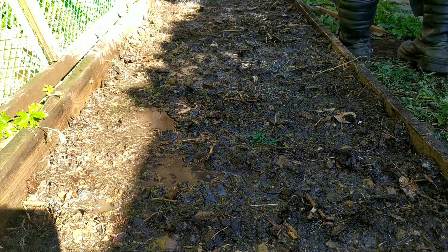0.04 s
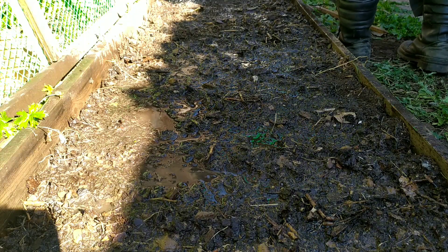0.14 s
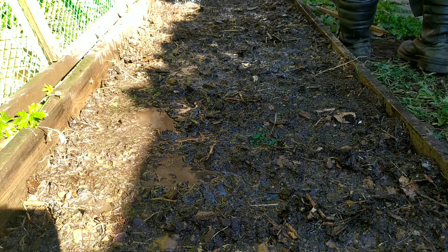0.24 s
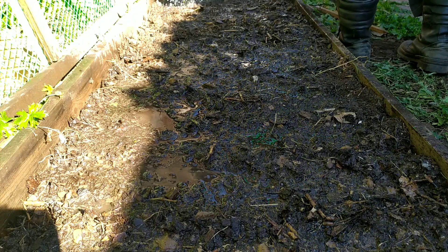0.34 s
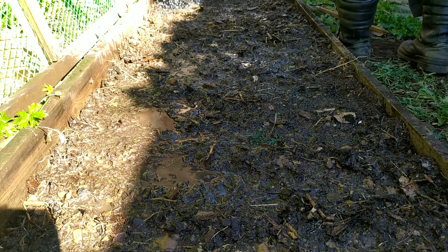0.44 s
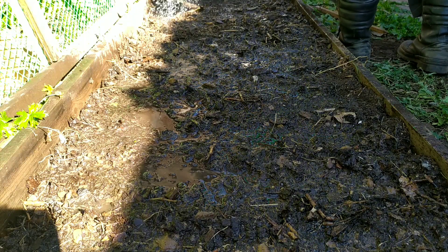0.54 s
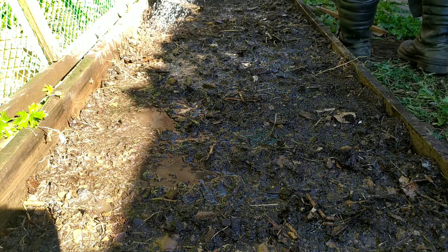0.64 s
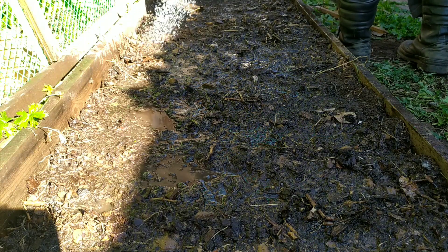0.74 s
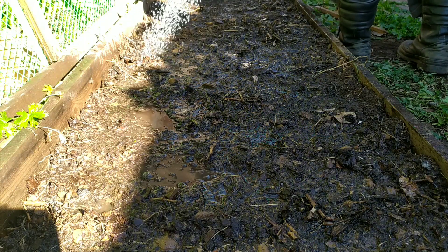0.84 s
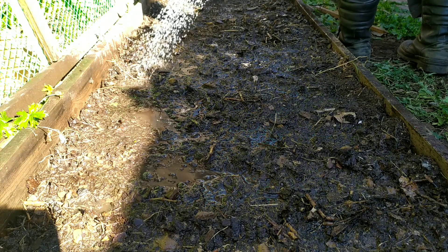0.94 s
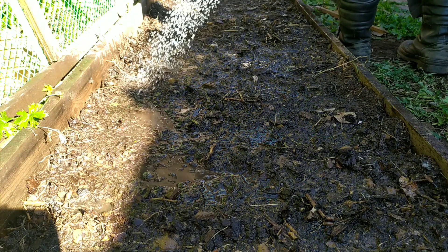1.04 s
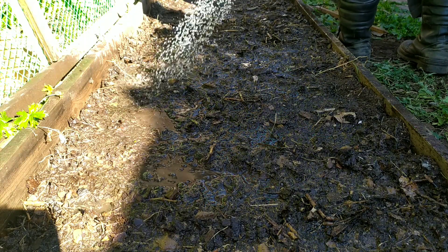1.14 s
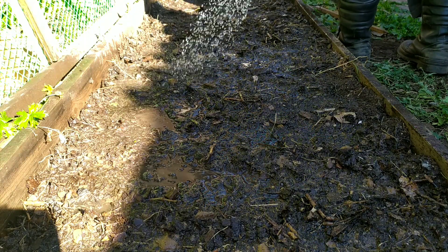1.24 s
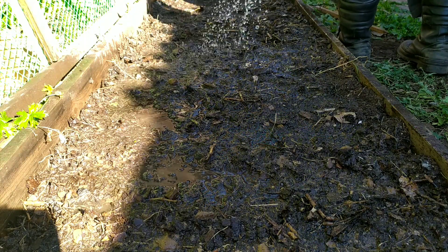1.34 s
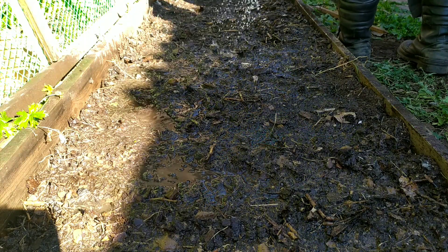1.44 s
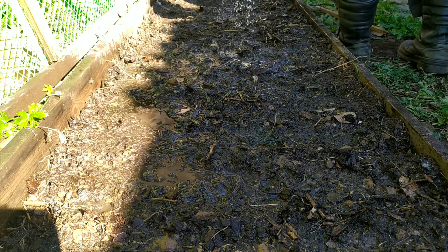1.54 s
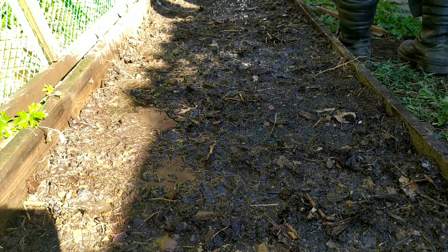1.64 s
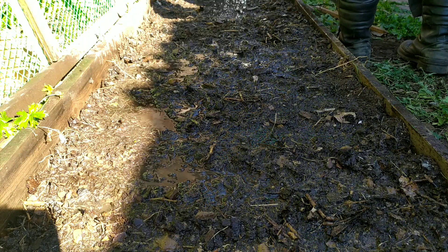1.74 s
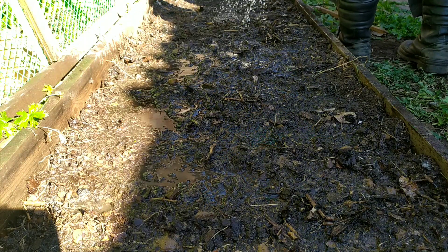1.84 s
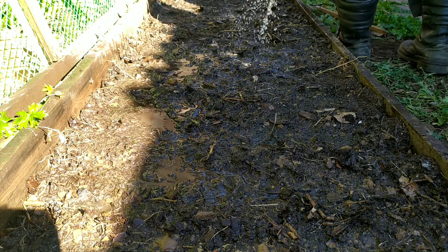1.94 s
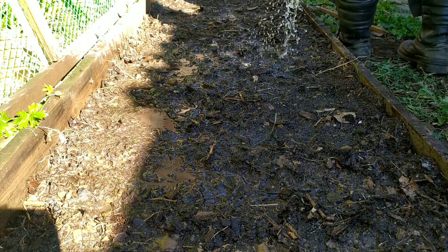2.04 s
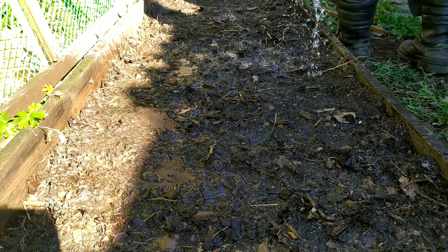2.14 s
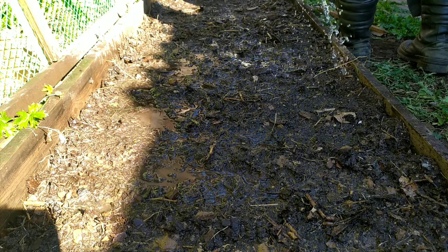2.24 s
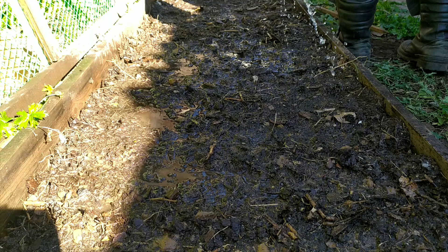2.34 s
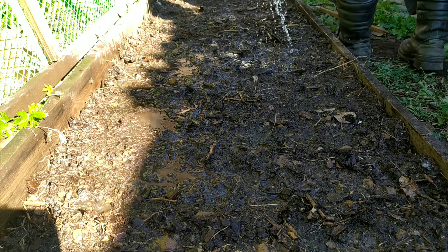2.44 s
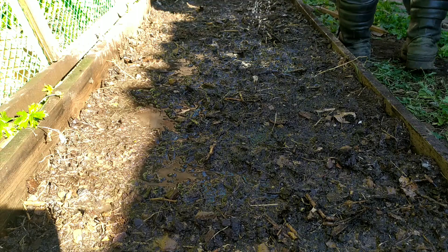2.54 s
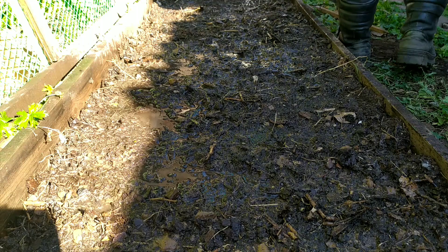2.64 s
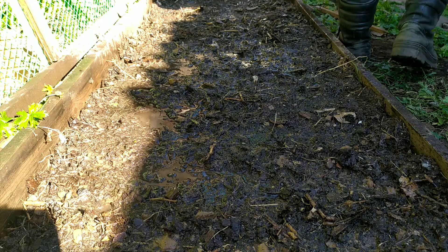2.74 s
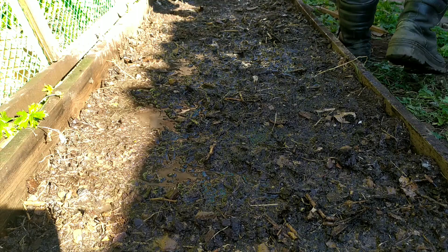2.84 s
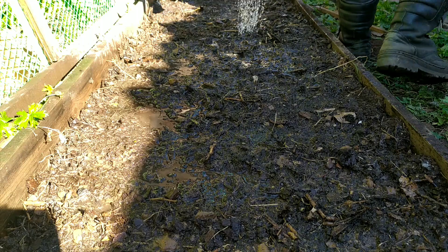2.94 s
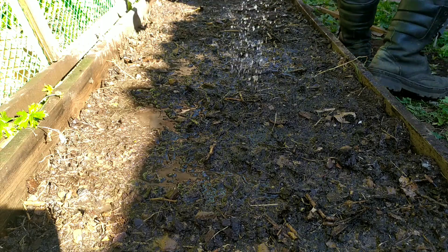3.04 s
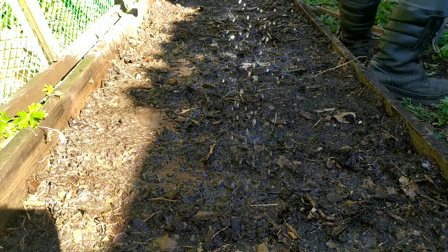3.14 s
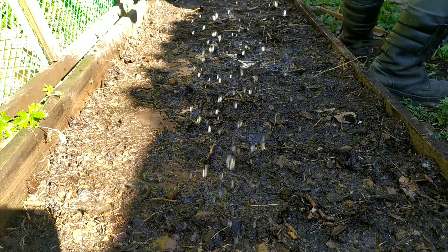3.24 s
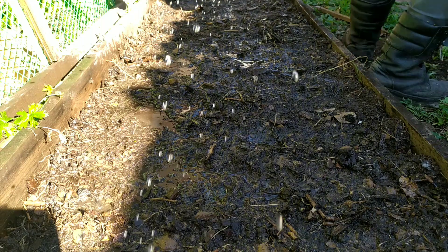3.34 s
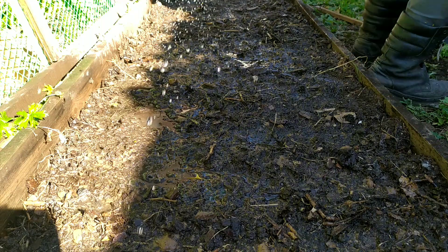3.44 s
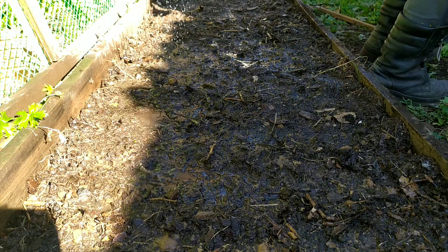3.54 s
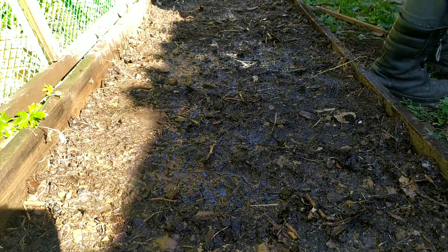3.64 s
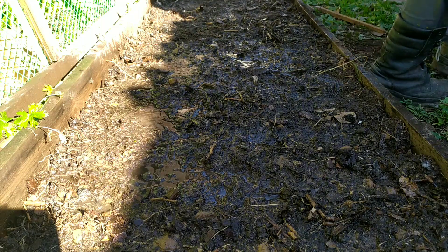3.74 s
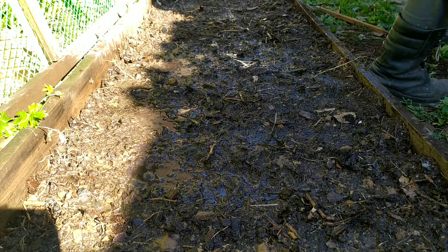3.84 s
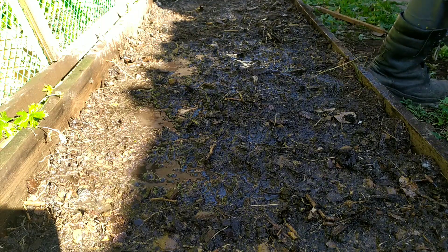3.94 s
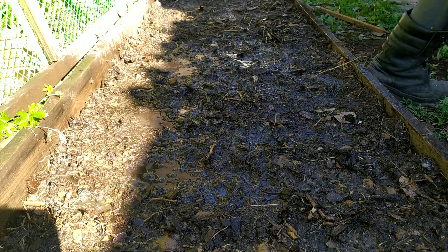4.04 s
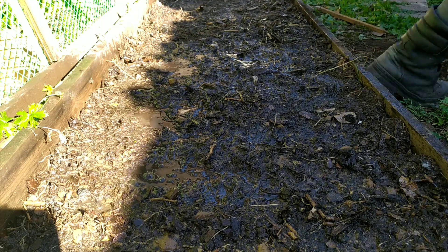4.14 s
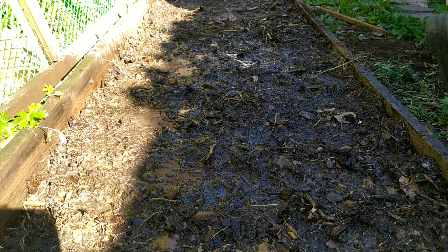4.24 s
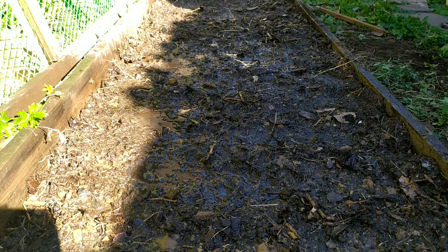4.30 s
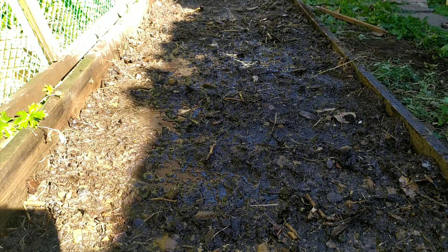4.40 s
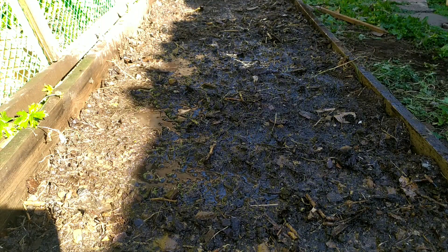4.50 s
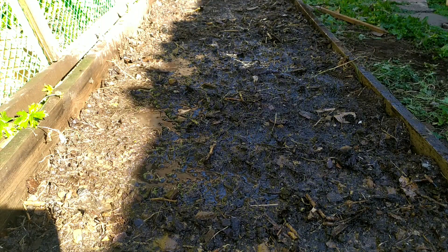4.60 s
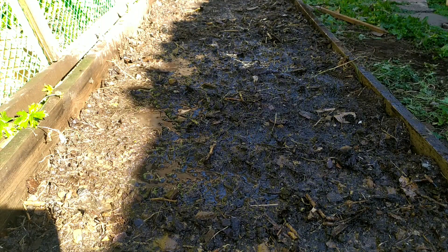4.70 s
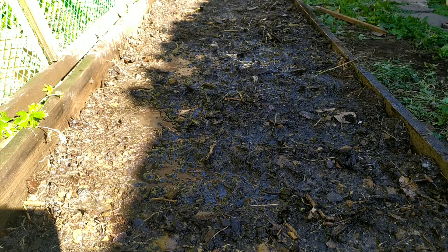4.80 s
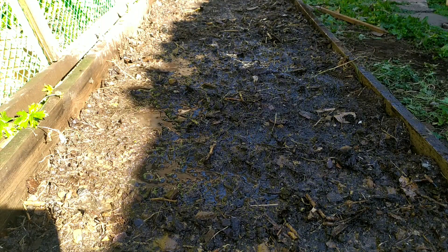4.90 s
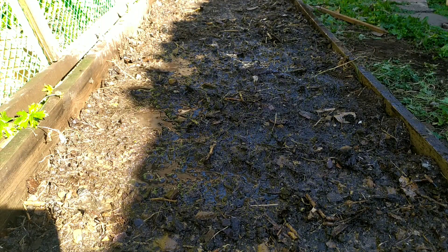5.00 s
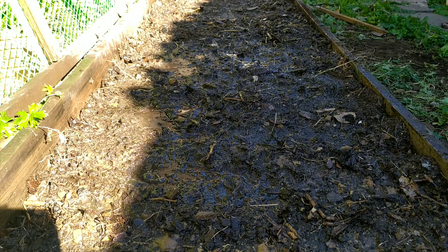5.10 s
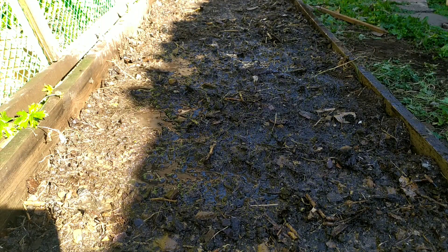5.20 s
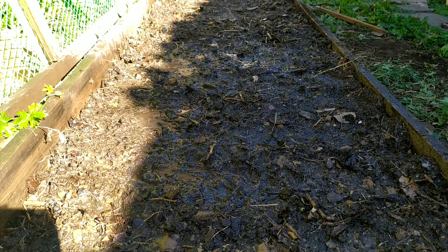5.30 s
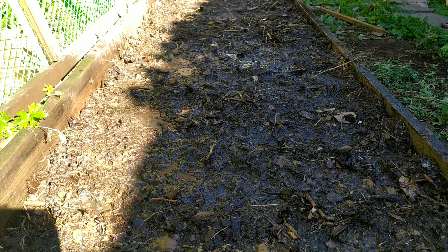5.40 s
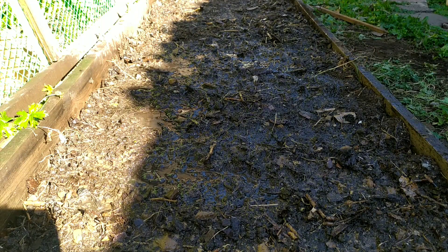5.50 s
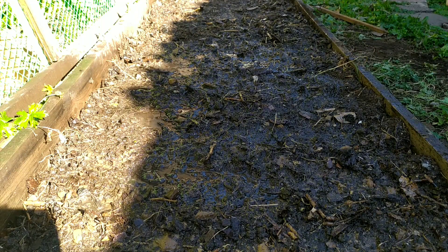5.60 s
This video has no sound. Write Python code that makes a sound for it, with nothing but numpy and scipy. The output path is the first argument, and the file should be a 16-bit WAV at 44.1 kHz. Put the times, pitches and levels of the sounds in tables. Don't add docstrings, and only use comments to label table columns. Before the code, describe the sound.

A watering can showers wet garden soil in hissing sweeps, thins to drips, then rubber boots thump a plank and scuff dry leaves.

```python
import sys
import numpy as np
from scipy import signal
from scipy.fft import rfft, irfft, next_fast_len
from scipy.io import wavfile
from scipy.ndimage import uniform_filter1d

SR = 44100
rng = np.random.default_rng(int(sys.argv[2]) if len(sys.argv) > 2 else 0)


def wrap_up_sound(samples):
    columns = np.atleast_2d(samples).T
    tamed = np.clip(columns, -1, 1)
    steps = np.round(tamed * 32767).astype(np.int16)
    wavfile.write(sys.argv[1], SR, steps)


def voltage_ratio(decibels):
    exponent = np.asarray(decibels, float) / 20
    return 10 ** exponent


N = 249606
T = np.arange(N) / SR
TOP_HZ = 14500

# start_s, left_late_samples
WATER_AIM = [(0, 1), (.3, 1.5), (.6, 3), (.85, 4.2), (.97, 5), (1.06, 5.6), (1.17, 5), (1.25, 3),
             (1.32, .4), (1.45, 0), (1.95, -1), (2.3, -5), (2.4, -5), (2.55, -3), (2.7, -1), (3.2, -.6),
             (3.32, 1.6), (3.5, .4), (3.6, 4), (4, 4)]
# start_s, left_late_samples
WALK_PATH = [
    (0, -17),
    (4.3, -17),
    (4.45, -21),
    (5.66, -22),
]
# frequency_hz, left_right_db
MIC_LEAN = [(300, -1), (3000, -1), (7500, -1), (11500, 2), (15000, 3)]


def evened(x):
    return x / np.sqrt(np.mean(x ** 2) + 1e-20)


def read(points, hz):
    f, value = np.transpose(points)
    return np.interp(np.log(hz + 1), np.log(f + 1), value)


def curves(rows):
    s, *columns = np.transpose(rows)
    return [np.interp(T, s, c) for c in columns]


def add(mix, s, sound, pan_db, late):
    for side, sign in enumerate((1, -1)):
        start = round(s * SR) + (1 - side) * round(late)
        part = mix[side, start:][:sound.shape[1]]
        part += voltage_ratio(sign * pan_db / 2) * sound[side, :len(part)]


def delayed(x, late):
    return x[np.clip(np.arange(N) - np.round(late).astype(int), 0, N - 1)]


def band(x, lo_hz, hi_hz):
    sos = signal.butter(2, [lo_hz, min(hi_hz, SR / 2.1)], "band", fs=SR, output="sos")
    return signal.sosfilt(sos, x)


def leaned(x, lean):
    size = next_fast_len(N)
    half_db = read(lean, np.fft.rfftfreq(size, 1 / SR)) / 2
    return irfft(rfft(x, size) * voltage_ratio([half_db, -half_db]), size)[:, :N]


def noise(colour, patchy_db, flicker_db):
    # frequency_hz, correlation
    likeness = [(60, 0.6775), (250, 0.7417), (640, 0.6081), (1400, 0.039), (4000, 0.11), (15000, 0.046)]
    frames, hz = N // 256 + 5, np.fft.rfftfreq(512, 1 / SR)
    a, b, c, d, patches = rng.standard_normal((frames, 257, 5)).T
    patches = uniform_filter1d(patches, size=8, axis=0)
    patches = evened(uniform_filter1d(patches, size=6, axis=1))
    flicker = evened(uniform_filter1d(rng.standard_normal(frames), size=2))
    same = np.clip(read(likeness, hz), -1, 1)[:, None]
    left = a + 1j * b
    right = same * left + np.sqrt(1 - same ** 2) * (c + 1j * d)
    colour_db = read(colour, np.minimum(hz, TOP_HZ))[:, None]
    z = np.array([left, right]) * voltage_ratio(colour_db + patchy_db * patches + flicker_db * flicker)
    return evened(signal.istft(z, window="cosine", nperseg=512, noverlap=256)[1][:, :N])


def grains(colour, lo_hz, hi_hz, per_ms, late, scatter, cycles, spread_db, count):
    most_per_ms = 12
    pitches, out = np.geomspace(lo_hz, hi_hz, count), np.zeros((count, 2, N))
    for k, hz in enumerate(pitches):
        when, hit, size, place, pan = rng.random((most_per_ms * 1000 * N // SR // count, 5)).T
        at = (when * N).astype(int)
        heard = hit < per_ms[at] / most_per_ms
        sizes = voltage_ratio(spread_db * np.minimum(-np.log(size), 4)) * heard
        shift = np.round(late[at] + scatter[at] * (place - .5)).astype(int)
        left = np.bincount(np.clip(at + shift, 0, N - 1), sizes * (1.5 - pan), N)
        right = np.bincount(at, sizes * (.5 + pan), N)
        u = np.arange(256) * hz / SR
        ring = np.sin(2 * np.pi * u * (1 + 0.014 * u)) * np.exp(-u / cycles)
        ring *= voltage_ratio(read(colour, min(hz, TOP_HZ))) * np.sqrt(hz) / np.linalg.norm(ring)
        train = signal.oaconvolve(np.array([left, right]), ring[None], axes=1)[:, :N]
        out[k] = train / np.sqrt(per_ms)
    return pitches, out / np.sqrt(np.mean(out.sum(0) ** 2))


def shower():
    # start_s, shower_level_db, spray_fineness_db
    flow = [(0.0, -52, 10), (0.2, -43, 6.5), (0.31, -42, 5), (0.62, -46.5, 5), (0.82, -52.5, 6),
            (0.92, -43, 4), (1.05, -43.5, 6), (1.3, -43, 3), (1.5, -49.5, 4), (1.7, -57.5, 4.5),
            (2.03, -48.5, 2.5), (2.33, -57, 1), (2.92, -59.5, 5), (3.05, -49.5, 7), (3.14, -57, 8),
            (3.55, -53.5, 5), (3.6, -62, 3), (4.0, -59.5, -4.5)]
    # start_s, breadth_samples
    breadth = [(0, 6), (.4, 4), (.7, 4), (.88, 2.8), (1, 2.9), (1.18, 3.4), (1.27, 7), (4, 7)]
    # frequency_hz, density_db_per_hz
    fizz = [(760, -29.5), (1300, -26.5), (3790, -6), (4630, -3.5), (5260, -2), (7130, 0), (14900, -14),
            (16000, -62)]
    # frequency_hz, density_db_per_hz
    soil = [(88, -7.5), (150, -1), (342, -1.5), (516, -9), (718, -5.5), (1720, -17), (2500, -13.5),
            (3250, -13), (5500, -120)]
    fizz_db, fine_db = curves(flow)
    top_db = fizz_db + fine_db
    drum_db = -59 + 0.8005 * (fizz_db + 46.0)
    drum_db += 7 * np.exp(-((T - 3.4202) / 0.5597) ** 2)
    late, width = curves(WATER_AIM)[0], curves(breadth)[0]
    fade = np.clip((4.0 - T) / .2, 0, 1)

    per_ms = np.clip(5.0 * voltage_ratio(0.98 * (fizz_db + 45)), 4, 12)
    pitches, ticks = grains(fizz, 1200, 15500, per_ms, late, width, cycles=3.5, spread_db=1.8, count=18)
    high = np.clip(np.log2(pitches / 6000), 0, 1)[:, None, None]
    out = (ticks * voltage_ratio(-0.7631 + (1 - high) * fizz_db + high * (top_db - 2.0))).sum(0)

    mist = noise(fizz, patchy_db=3, flicker_db=1)
    apart = np.clip(width / 5.5, 0, .9)
    mist[0] = apart * mist[0] + np.sqrt(1 - apart ** 2) * delayed(mist[1], late)
    out += voltage_ratio(fizz_db + 2.638) * band(mist, 1500, 6200)
    out += voltage_ratio((fizz_db + top_db) / 2 - 1.9316) * band(mist, 6200, 11280)
    out += voltage_ratio(top_db + 6.0) * band(mist, 11280, 18000)

    drumming = noise(soil, patchy_db=1.5, flicker_db=2.0)
    return fade * (out + voltage_ratio(drum_db - 0.5) * drumming)


def garden():
    # frequency_hz, density_db_per_hz
    air = [(15, -50), (25, 1), (200, -16.5), (285, -9), (317, -20.5), (516, -16.5), (754, -17.5),
           (2350, -19.5), (4740, -19), (14800, -23), (16000, -40)]
    # nearest_s, level_db
    cars = [
        (0.3, -53),
        (0.8, -58.5),
        (1.4, -52.5),
        (2.101, -54.5),
        (3.2, -54.5),
        (3.55, -56),
        (4.2, -54.5),
        (4.9, -57.5),
        (5.17, -57.5),
        (5.62, -55.5),
    ]
    # start_s, end_s, pitch_hz, level_db
    hums = [
        (1.8622, 3.28, 71, -55.5),
        (0.7074, 1.18, 133, -56),
        (1.3117, 1.7986, 44, -58),
        (3.21, 3.89, 74, -61),
    ]
    # start_s, pitch_hz, level_db
    whine = [
        (5.19, 14100, -72),
        (5.21, 14000, -63),
        (5.25, 13450, -68),
        (5.285, 12850, -68),
        (5.35, 12400, -64),
        (5.385, 12600, -69),
    ]
    # start_s, pitch_hz, level_db
    cheep = [
        (3.64, 4500, -66),
        (3.69, 4486, -65),
        (3.74, 4521, -55),
        (3.755, 4624, -70.5),
    ]
    road_colour = [(20, 3.5), (45, -10.5), (90, -7.0), (150, -14.5), (500, -37.5), (16000, -112)]
    far = noise(road_colour, patchy_db=1.0, flicker_db=1.5)
    road = voltage_ratio(-60.5) ** 2
    for s, db in cars:
        road = road + voltage_ratio(db - 2.5) ** 2 * np.exp(-((T - s) / 0.25253) ** 2)
    out = voltage_ratio(-60.5) * noise(air, patchy_db=4.0, flicker_db=0.7797) + np.sqrt(road) * far

    for start, end, hz, db in hums:
        waver, swell = (evened(uniform_filter1d(v, size=1500)) for v in rng.standard_normal((2, N)))
        on = np.clip(np.minimum(T - start, end - T) / 0.16686, 0, 1)
        turns = np.cumsum(hz * (1 + 0.03027 * waver)) / SR
        out += voltage_ratio(db + 3.03 * swell) * on * np.sin(2 * np.pi * turns)

    for song in (whine, cheep):
        hz, db = curves(song)
        flutter = evened(uniform_filter1d(rng.standard_normal(N), size=150))
        on = (T > song[0][0]) & (T < song[-1][0])
        turns = np.cumsum(hz * (1 + .005 * flutter)) / SR
        out += on * voltage_ratio(db + 1.5 * flutter) * np.array([[1], [.3]]) * np.sin(2 * np.pi * turns)
    return out


def drops(rows, lags):
    out, t = np.zeros((2, N)), np.arange(900) / SR
    for s, db, hz, pan_db in rows:
        ring_ms = .55 * (7000 / hz) ** 0.51
        u = t * 1000 / ring_ms
        shared, own = rng.standard_normal(len(t)), rng.standard_normal((2, len(t)))
        hiss = .5 * shared + .85 * own
        turns = np.cumsum(np.minimum(hz * (.93 + 0.074 * u), SR / 2.5)) / SR
        note = .9 * np.sin(2 * np.pi * turns) * np.exp(-u) * np.minimum(turns / 1.2565, 1)
        splinters = .6 * np.exp(-u / 2)
        splash = .17 * np.exp(-t * 1000 / 5)
        body = band(hiss * (splinters + splash), hz / 1.3, hz * 1.3)
        crack = .4 * band(hiss * np.exp(-2 * u), 2000, 15000)
        tick = note + body + crack
        tick = tick / np.sqrt(uniform_filter1d(tick ** 2, size=16, axis=1).max(1, keepdims=True))
        late = np.interp(s, *np.transpose(lags))
        add(out, s - .0003, voltage_ratio(db - 1.8857) * tick, pan_db - read(MIC_LEAN, hz), late)
    return out


def water_drops():
    # start_s, peak_db,
    # pitch_hz, left_right_db
    big_drops = [(0.0086, -39.5, 6682, 4.5), (0.0332, -34, 11680, 3.5), (0.0497, -37.5, 6740, -2),
                 (0.0991, -37, 6495, 0), (0.105, -34.0, 6833, -5), (0.1548, -32.5, 12200, 5.5),
                 (0.2193, -29, 10450, 0), (0.3043, -29.5, 6526, -4), (0.3192, -31, 5470, -4.5),
                 (0.3353, -27.5, 7506, -0.5), (0.3518, -26, 6290, -6.5), (0.4095, -31.5, 7945, -2.5),
                 (0.5634, -32.5, 9912, 4.5), (0.5827, -28.5, 9350, 1), (0.6008, -38.5, 13790, 5),
                 (0.6058, -36.5, 6999, 9), (0.6803, -32.5, 13350, 4.5), (0.6834, -31.5, 6643, -6),
                 (0.8171, -39, 6883, -7), (0.8532, -35, 4759, -1), (0.8846, -29.5, 7395, 1),
                 (0.8951, -27.5, 4940, -4), (0.9111, -26.5, 5035, -1), (0.947, -25, 11250, -2),
                 (0.9861, -36.5, 9014, -2.5), (0.9905, -31.5, 9340, 4), (0.9935, -33, 4891, 0.5),
                 (1.0004, -25, 7158, -0.5), (1.0193, -27.5, 9170, -2), (1.0598, -42, 7620, -1),
                 (1.0638, -28.5, 8700, -1), (1.0714, -33, 5507, -1), (1.1095, -27.5, 7089, -6.5),
                 (1.1563, -27.0, 5330, -6), (1.2124, -35.5, 7446, -7), (1.2359, -35.5, 6292, -1.5),
                 (1.269, -30.5, 5110, -5.5), (1.2856, -28.5, 8355, -2.5), (1.2939, -29.5, 5264, 0.5),
              (1.3165, -32.5, 5450, -3), (1.3293, -21.5, 9934, 3), (1.3489, -34, 6970, -4.5),
              (1.3529, -32, 7222, -6.5), (1.3844, -26.5, 7393, -2.5), (1.4094, -28.5, 7206, -6),
              (1.4204, -29, 6890, -5), (1.432, -25.5, 9646, -2), (1.4657, -32, 4274, -2),
              (1.479, -27.5, 6822, -2.5), (1.5014, -30.5, 7842, -2.5), (1.5034, -38.5, 13840, 6),
              (1.5687, -37, 4581, 2.5), (1.6143, -44, 7483, 1), (1.6501, -46, 9143, -4),
              (1.6589, -45.5, 6790, 0), (1.678, -46.5, 6467, 2), (1.7104, -42, 3572, -0.5),
              (1.72, -43, 11410, -2), (1.758, -42, 7775, -2.5), (1.7745, -37, 14460, 3.5),
              (1.7916, -34, 11250, 1.5), (1.8452, -36, 11480, 1.5), (1.8492, -35.5, 6195, -2),
              (1.861, -40, 3227, -4.5), (1.8768, -42, 7446, -0.5), (1.8895, -39.5, 6918, 1),
              (1.912, -42.5, 5499, -4.5), (1.9215, -38.5, 13560, 4), (1.924, -41, 6892, 4.5),
              (1.9533, -43.5, 5463, -4.5), (1.9781, -35, 3534, -5.5), (1.9907, -35, 3180, 4),
              (1.9997, -36.5, 13360, 3.5), (2.017, -29.5, 4192, -1.5), (2.025, -29.5, 5491, -2.5),
              (2.059, -29.5, 5691, 0.5), (2.093, -36, 11500, 5), (2.1059, -31, 6604, -1.5),
              (2.1404, -40.0, 2933, -0.5), (2.163, -32.5, 11420, 3.5), (2.186, -46.5, 9090, 0),
              (2.2045, -38.5, 9183, 1.5),
                 (2.266, -49, 3170, -2), (2.2716, -23.5, 9196, 2.5), (2.3224, -28, 6868, -0.5),
             (2.3365, -32.5, 7514, 4), (2.3539, -36.5, 12570, 5), (2.358, -35.5, 5572, -3),
             (2.3965, -46.5, 5770, 0), (2.4051, -38.5, 13090, 5), (2.4121, -38.5, 8937, 1),
             (2.4284, -44.5, 2923, 1), (2.5001, -31, 7057, -3), (2.538, -35, 6287, 2.5),
             (2.5406, -35, 6605, -3.5), (2.5558, -40.0, 7393, -7), (2.5681, -33.5, 6285, -4.5),
             (2.5718, -39.5, 6544, -2.5), (2.591, -38, 6469, 0.5), (2.6391, -41.0, 7619, 0.5),
             (2.6647, -46.5, 6842, -3), (2.7209, -46.0, 3284, 6), (2.8354, -45, 3741, 2),
             (2.844, -46.5, 4247, 5), (2.904, -34.5, 8020, -3.5), (2.912, -29, 12370, 2),
             (3.0031, -33, 5692, -1), (3.0245, -29, 10130, -2.5), (3.0492, -34, 6813, -2.5),
             (3.0746, -32.5, 7334, -1.5), (3.0876, -39, 7492, -1), (3.09, -36.5, 7430, -5.5),
                 (3.1483, -41, 8054, -0.5), (3.1772, -28, 8097, 3.5), (3.1795, -26.5, 5788, -2),
              (3.2066, -44.5, 11800, 3.5), (3.213, -31.5, 5378, -2.5), (3.2221, -27.5, 7552, 1.5),
              (3.2327, -35.0, 8710, -2), (3.2485, -33, 4427, 0), (3.2502, -28.5, 10340, 2),
              (3.2567, -36.5, 9710, -0.5), (3.2646, -30.5, 8566, -0.5), (3.2755, -25.5, 9445, 1.5),
              (3.2868, -34, 12340, 4.5), (3.3056, -34, 6937, -2.5), (3.3217, -24.5, 5945, 0),
              (3.3266, -36.5, 12470, 7.5), (3.3578, -30.5, 11130, -4), (3.3619, -25.5, 13530, 5),
              (3.3941, -32, 12810, 1), (3.4462, -36, 7811, -1), (3.4592, -23.5, 5985, 0),
              (3.474, -43.5, 5462, 0), (3.5023, -45, 11720, 0.5), (3.5201, -42.5, 5692, -4),
              (3.5526, -36.5, 6840, 4), (3.5645, -36, 6658, -6), (3.6514, -50.5, 10430, 0.5),
              (3.6552, -46, 6714, -1), (3.6716, -55.5, 6810, -4.5), (3.7111, -50, 6757, 1),
              (3.7539, -37.5, 13220, -1), (3.7551, -49, 6470, -3), (3.7597, -45.5, 13650, 0),
              (3.8769, -49, 12590, 8.5), (3.9817, -50, 7300, -0.5), (4.0355, -46, 9616, -1)]
    return drops(big_drops, WATER_AIM)


def bubbles():
    # start_s, level_db, start_hz, end_hz, length_ms
    pockets = [(0.669, -48.5, 1797, 1998, 4.68), (1.557, -42, 1738, 2013, 1.671),
               (1.991, -37.5, 2127, 3596, 4.11), (2.015, -32, 1789, 1895, 3.012),
               (2.205, -48.5, 891, 1101, 2.088), (2.396, -46.5, 1121, 1300, 0.998),
               (2.446, -48, 1356, 1600, 1.359), (2.5, -37.5, 1960, 4327, 6.171),
               (2.5716, -46, 900, 1200, 0.898), (2.659, -62, 2068, 2041, 31.36),
               (2.809, -46.5, 1310, 1500, 1.369), (2.849, -56, 1455, 1558, 14.08),
               (1.2701, -40, 2328, 3017, 1.952), (1.384, -38.5, 3230, 3892, 2.942),
               (1.426, -48, 1523, 1914, 1.278), (1.4785, -43, 2108, 2802, 1.168),
               (1.81, -43, 2090, 2405, 1.842), (2.375, -49, 899.3, 1100, 1.31),
               (3.267, -44.5, 1276, 1596, 2.26), (3.368, -49, 1110, 1420, 2.734),
               (3.4864, -44, 1549, 1091, 3.54), (3.487, -43.5, 3040, 2630, 3.847),
               (3.493, -43.5, 1367, 1662, 5.407), (3.507, -49, 996.8, 1299, 5),
               (3.49, -47, 1037, 1041, 12.38), (3.501, -46.5, 1312, 981, 5.677),
               (3.518, -39, 1369, 1723, 1.397), (2.834, -49, 3512, 3876, 3.464)]
    out = np.zeros((2, N))
    for s, db, start_hz, end_hz, ms in pockets:
        u = np.arange(round(ms * SR / 600)) * 1000 / (SR * ms)
        turns = np.cumsum(start_hz + (end_hz - start_hz) * np.minimum(u, 1.2) ** 2) / SR
        tone = np.sin(2 * np.pi * turns) * np.minimum(u * 12, 1) * np.exp(-1.5 * u ** 2)
        add(out, s, voltage_ratio(db) * np.array([tone, tone]), -1.5, -2)
    return out


def plank():
    # frequency_hz, level_db, t60_s
    modes = [(68, 1, 0.1897), (101.68, 0, 0.1324), (145, 5.5, 0.03704), (185, -2.5, 0.21007),
             (257.49, -0.5, 0.24384), (325, -4, 0.05068), (369.23, -11, 0.21353), (486.34, -1, 0.0671),
             (601.68, -8, 0.1779), (742.87, -8, 0.07637)]
    # start_s, strength_db, favoured_pitch_hz, spread_octaves, damping_factor
    blows = [(1.188, -38, 109.6, 0.807, 2.34), (3.069, -38, 114.2, 0.8124, 1.596),
             (4.11, -28, 98.54, 0.7212, 2.226), (4.194, -27, 251.8, 1.1495, 0.7094),
             (4.195, -30, 690, 0.745, 0.8537), (4.207, -32.5, 220.2, 0.899, 0.9655),
             (4.396, -37, 200.8, 0.3786, 0.786), (4.483, -32, 639.9, 0.3757, 4.53),
             (4.773, -38.5, 68, 0.2005, 0.9023), (4.870, -22, 325, 0.14277, 1.1734),
             (4.872, -25.5, 106.2, 0.5695, 1.573), (4.882, -35, 185, 0.3228, 1.051),
             (4.931, -28.5, 68, 0.3425, 3.906), (4.992, -34.5, 198.1, 0.6387, 3.112),
             (5.405, -38, 205.3, 0.621, 1.611), (5.426, -38, 194.9, 0.688, 1.1052),
             (5.483, -38, 408.9, 0.5471, 0.5356), (5.491, -36.5, 145, 0.2799, 0.4544)]
    out, t = np.zeros((2, N)), np.arange(SR // 3) / SR
    for s, db, hz, spread, damping in blows:
        ring = np.zeros(len(t))
        for f, mode_db, t60 in modes:
            favour_db = -6.849 * (np.log2(f / hz) / spread) ** 2
            ring += voltage_ratio(mode_db + favour_db - 60 * t * damping / t60) * np.sin(2 * np.pi * f * t)
        ring *= 1 + 0.3696 * evened(uniform_filter1d(rng.standard_normal(len(t)), size=300))
        ring *= -voltage_ratio(db) * (1 - np.exp(-t * hz / 0.6639))
        add(out, s, np.array([ring, ring]), 1.2, np.interp(s, *np.transpose(WALK_PATH)) - 1)
    return out


def leaf_scuffs():
    # peak_s, level_db, rise_ms, fall_ms
    scuffs = [(4.134, -46, 32.62, 28.66), (4.1933, -38.5, 0.402, 10.22), (4.205, -38, 1.04, 28.734),
              (4.31, -49.5, 36.75, 42.36), (4.333, -50, 5.38, 81.73), (4.399, -45, 6.764, 34.45),
              (4.461, -54.5, 30.9, 73), (4.614, -55.5, 19.33, 41.38), (4.664, -51.5, 0.869, 6.04),
              (4.679, -52.5, 1.62, 14.52), (4.7, -54, 6.76, 65.1), (4.94, -52, 83.6, 50.94),
              (4.989, -56.5, 38.6, 205.4), (5.4, -43, 4.267, 30.63), (5.38, -53, 2.463, 9.78),
              (5.48, -38, 1.137, 36.7), (5.499, -42.5, 14.25, 41.42), (5.54, -46.5, 21.86, 21.5),
              (5.59, -57.5, 18.4, 41.96), (4.5, -57, 299.3, 406.4), (4.86, -66.5, 3.9, 21.7)]
    # frequency_hz, density_db_per_hz
    leaves = [(180, -1.5), (300, -11), (494, -6.5), (1360, -15.5), (2930, -10.5), (3240, -11.5),
              (14700, -14.5), (16000, -85)]
    t = T[::8]
    power = np.zeros(len(t))
    for s, db, rise_ms, fall_ms in scuffs:
        power += voltage_ratio(db) ** 2 * np.exp(-2000 * abs(t - s) / np.where(t < s, rise_ms, fall_ms))
    power = np.interp(T, t, power)
    late = curves(WALK_PATH)[0]
    _, trains = grains(leaves, 400, 15000, np.full(N, 8.0), late, np.full(N, 6),
                       cycles=1.5, spread_db=4, count=8)
    rustle = noise(leaves, patchy_db=2.5, flicker_db=1.0)
    rustle[0] = .9 * rustle[0] + .42 * delayed(rustle[1], late)
    crush = evened(0.53 * trains.sum(0) + 0.79 * rustle)
    return np.sqrt(power) * leaned(crush, [(500, 1.4), (4500, 1.2), (8000, 3.1), (13000, 4.36)])


def twigs():
    # start_s, peak_db, pitch_hz, left_right_db
    snaps = [(4.1365, -41.5, 12590, 3.5), (4.1935, -31, 8502, 6), (4.6125, -45.5, 8083, 4.5),
             (4.664, -46, 7831, 0.5), (4.6764, -42, 7854, 5), (4.6964, -39.5, 11780, 11),
             (4.712, -43, 6916, 3.5), (4.737, -47.5, 5970, 2.5), (5.3808, -47, 10200, 6.5),
             (5.3983, -38.5, 12220, 8.5), (5.4816, -31, 6240, -2), (5.486, -40, 7700, 4)]
    return drops(snaps, WALK_PATH)


def starved(x, margin_db):
    both = np.pad(np.array([x[0] + x[1], x[0] - x[1]]) / 2, ((0, 0), (126, 0)))
    z = signal.stft(both, window="cosine", nperseg=2048, noverlap=1024)[2]
    power = abs(z[:, :1020]).reshape(2, -1, 6, z.shape[2]).mean(2) ** 2
    mask = uniform_filter1d(.5 * power + .5 * power[::-1], size=21, axis=1)
    keep = power > mask * voltage_ratio(2 * margin_db + 2 * rng.standard_normal(power.shape[1:]))
    keep &= np.roll(keep, 1, axis=2)
    keep[:, :18], keep[:, 121:] = True, False
    edges = np.diff(np.pad(both[0], (1025, 2048)))[:(z.shape[2] + 1) * 1024].reshape(-1, 1024)
    sharp = abs(edges).max(1) > 7.5 * edges.std(1)
    keep[:, :121, sharp[:-1] | sharp[1:]] = True
    z[:, :1020] *= np.repeat(keep, 6, axis=1)
    mid, side = signal.istft(z, window="cosine", nperseg=2048, noverlap=1024)[1][:, 126:126 + N]
    return np.array([mid + side, mid - side])


def scene():
    clicks = water_drops() + twigs() + bubbles()
    t = np.arange(3000) / SR
    scatter = rng.standard_normal((2, len(t))) * voltage_ratio(-60 * t / .12) * (t > .002)
    echoes = signal.oaconvolve(clicks, scatter / np.linalg.norm(scatter[0]), axes=1)[:, :N]
    return clicks + voltage_ratio(-11.5) * echoes + shower() + garden() + plank() + leaf_scuffs()


def roll_off(x):
    return signal.sosfilt(signal.butter(12, 16810, fs=SR, output="sos"), x)


def record(dry):
    low_cut = signal.butter(5, 42, "high", fs=SR, output="sos")
    cut = signal.sosfilt(low_cut, leaned(dry, MIC_LEAN))
    cut = signal.oaconvolve(cut, signal.firwin(255, 16300, fs=SR)[None], "same")
    mix = starved(cut, margin_db=-4.9)
    return roll_off(mix)


dry = scene()
out = record(dry)
wrap_up_sound(out)
```